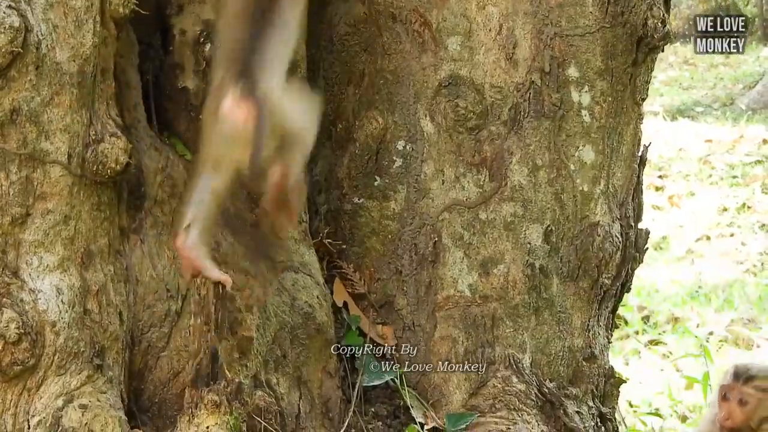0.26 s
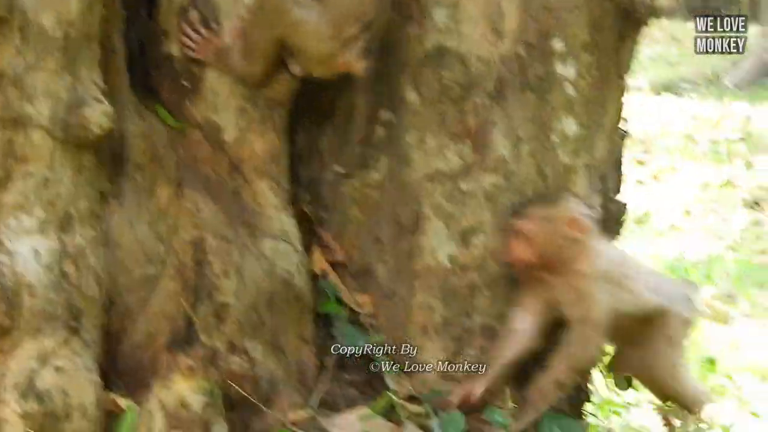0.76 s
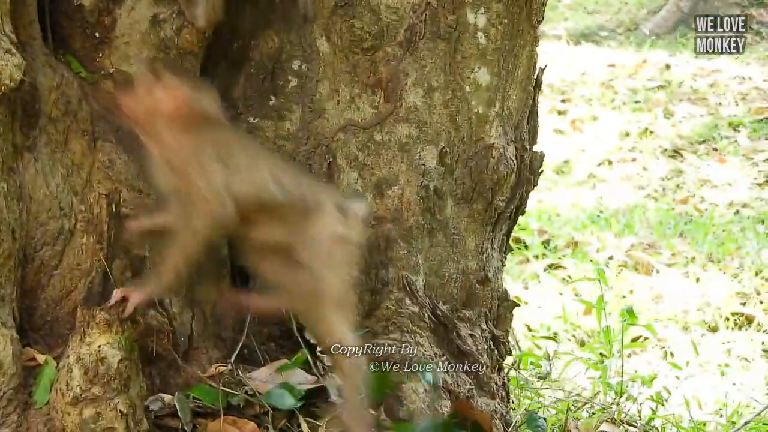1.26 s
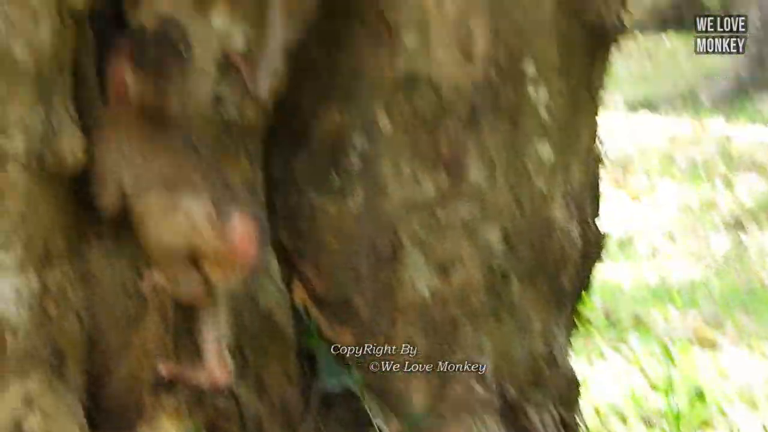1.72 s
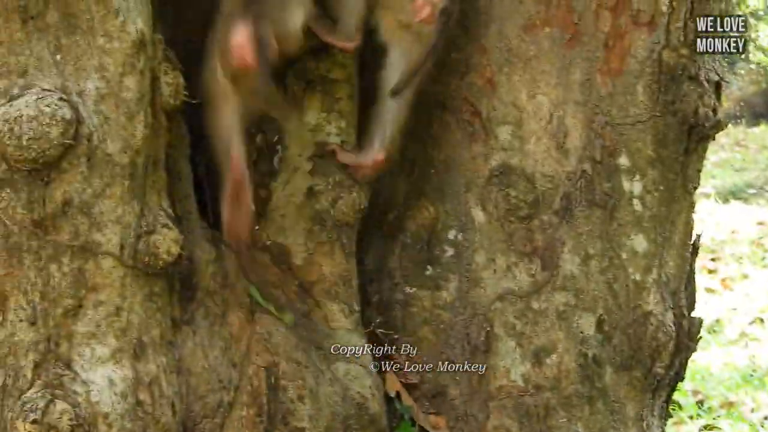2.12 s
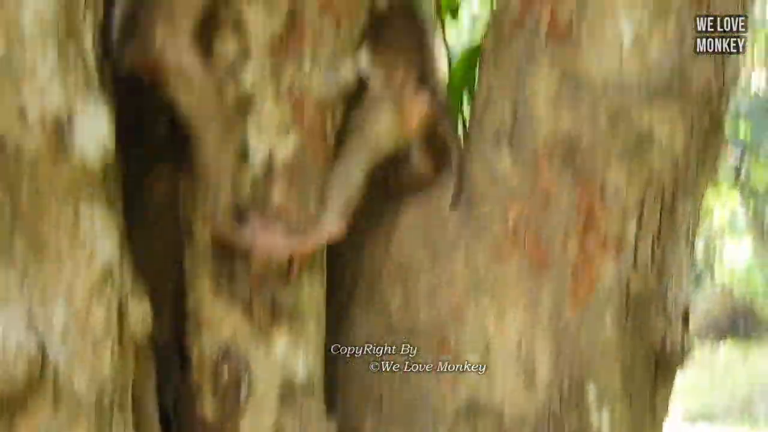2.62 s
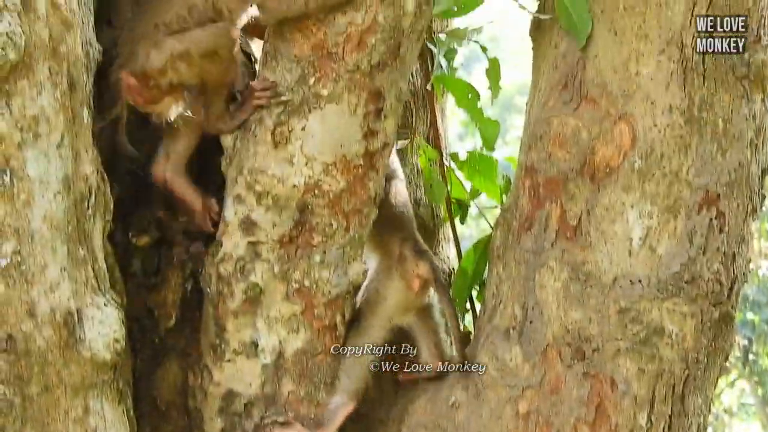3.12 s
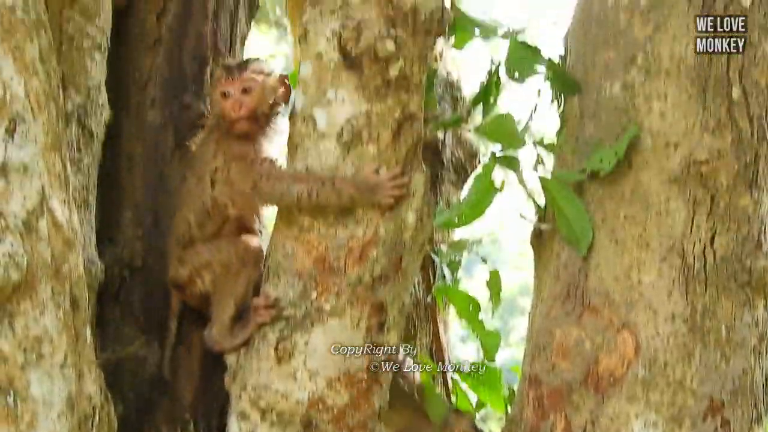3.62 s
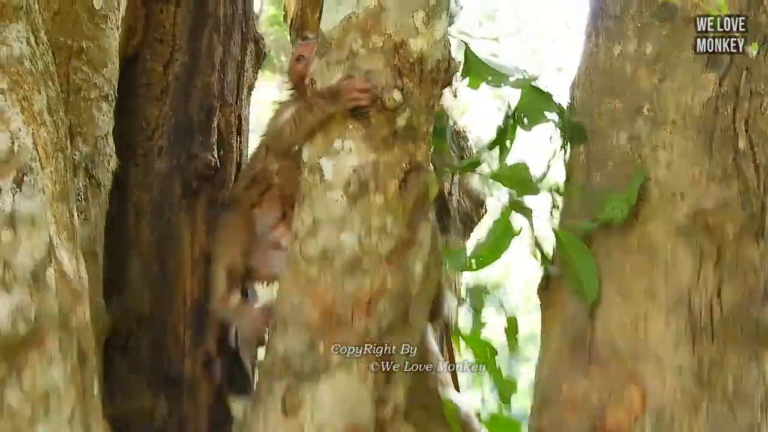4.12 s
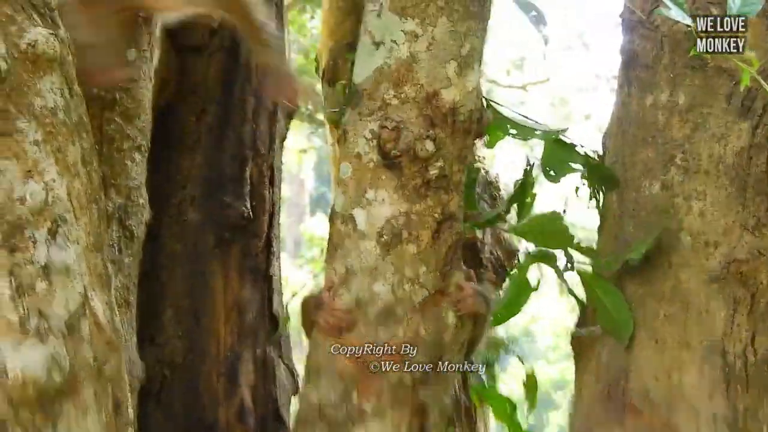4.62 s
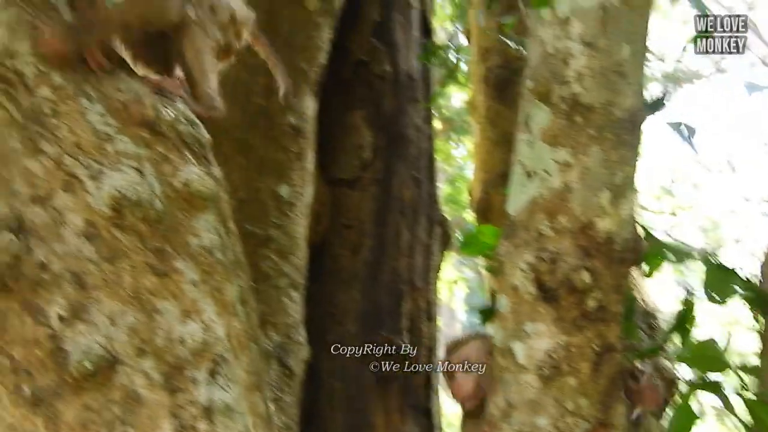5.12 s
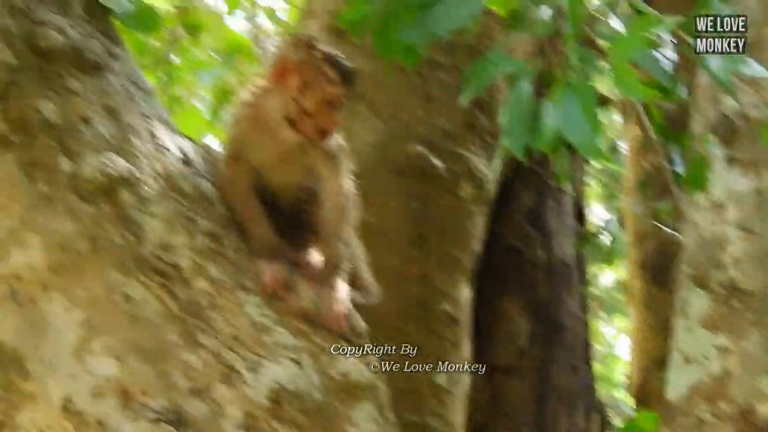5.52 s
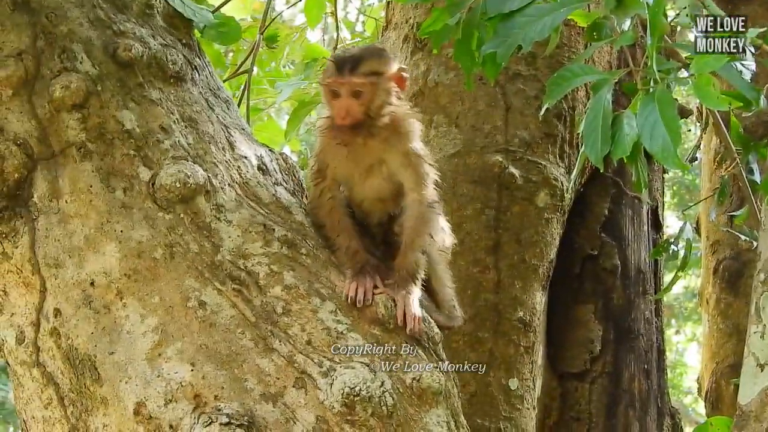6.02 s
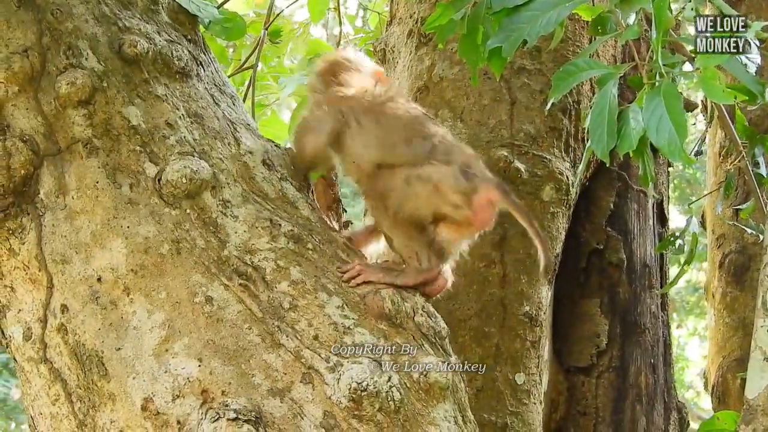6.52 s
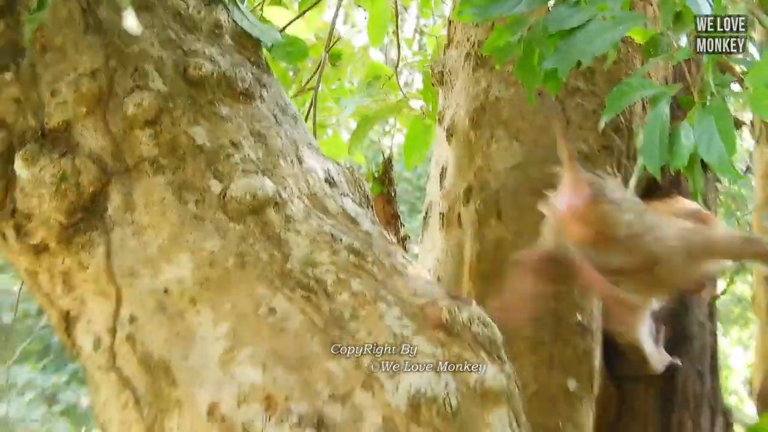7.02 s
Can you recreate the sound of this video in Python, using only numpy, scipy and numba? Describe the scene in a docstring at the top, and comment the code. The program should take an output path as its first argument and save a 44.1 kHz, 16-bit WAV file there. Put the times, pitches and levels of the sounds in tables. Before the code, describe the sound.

Cicadas ring in a steady, shimmering high drone over faint low traffic rumble, with small bird chips, distant soft hoots and late twig ticks.

```python
"""A park: cicadas drone in its trees, each buckling its ribs some 270 times a second and ringing near 2.7, 5.5, 8.2 kHz.
Near singers are stacks of multiples of that rate; the crowd behind them is coloured noise, as are the distant traffic
and a fading whirr. A small bird chips in falling sine sweeps and far hoots sound as sines with an octave.
Twigs tick and bark scrapes in short bursts of noise. All is heard on a close microphone pair, left and right."""
import sys
import numpy as np
from numba import njit
from scipy import signal
from scipy.fft import rfft, irfft, next_fast_len
from scipy.io import wavfile
from scipy.ndimage import uniform_filter1d

SR = 44100
rng = np.random.default_rng(int(sys.argv[2]) if len(sys.argv) > 2 else 0)


def generate_wav(sig):
    """Save sig (samples, or channels by samples) to the path in sys.argv[1] as 16-bit PCM at SR."""
    pcm = np.round(np.clip(np.atleast_2d(sig).T, -1, 1) * 32767).astype(np.int16)
    wavfile.write(sys.argv[1], SR, pcm)


N = 320077
T = np.arange(N) / SR  # s


def undb(db):
    """Decibels to an amplitude factor."""
    return np.exp(np.asarray(db) * np.log(10) / 20)


def walk(rate, size=8):
    """Random levels held 1 / rate s and slewed twice, in steps of a few samples; spread near 1."""
    k = int(SR / rate / size)
    held = np.repeat(rng.standard_normal(N // (k * size) + 1), k)
    slewed = uniform_filter1d(uniform_filter1d(held, k), k)
    return np.repeat(1.3 * slewed, size)[:N]


def noise(spectrum, ports):
    """Coloured noise of rms 1 at two ports that share part of it, the right one late."""
    size = next_fast_len(N)
    hz = np.arange(1, size // 2 + 2) * SR / size
    log_hz = np.log(hz)
    point_hz, db = np.transpose(spectrum)
    colour = undb(np.interp(log_hz, np.log(point_hz), db, left=-120, right=-120))
    point_hz, *columns = np.transpose(ports)
    alike, lag_us, pan_db = (np.interp(log_hz, np.log(point_hz), c) for c in columns)
    alike = np.clip(alike, 0, 1)
    left, other = rfft(rng.standard_normal((2, size)))
    late = left * np.exp(-2j * np.pi * hz * lag_us / 1e6)
    right = alike * late + np.sqrt(1 - alike ** 2) * other
    tilt = undb(pan_db / 2)
    pair = irfft(np.array([left * tilt, right / tilt]) * colour, size)[:, :N]
    return pair / pair.std()


@njit(fastmath=True)
def partials(turn, gains, swell, band):
    """Multiples of one turning phase, each with its own size and phase at the two ports."""
    out = np.zeros((2, len(turn)))
    for start in range(0, len(turn), 256):
        step = turn[start:start + 256]
        z = np.ones(len(step), np.complex128)
        for k in range(gains.shape[1]):
            z *= step
            if band[k] >= 0:  # -1 marks a silent multiple
                for i in range(len(z)):
                    level = swell[band[k], start + i]
                    out[0, start + i] += (gains[0, k] * z[i]).imag * level
                    out[1, start + i] += (gains[1, k] * z[i]).imag * level
    return out


# Colour of the far traffic. Each row: frequency in Hz, relative level in dB per Hz.
TRAFFIC_COLOUR = [(15, -19), (25, -30), (48, -4.5), (72, -3.5), (88, -9.5), (101, 2.5), (113, -4.5),
                  (127, 3), (138, -1.5), (149, 3.5), (163, 0.5), (170, -5), (179, 0.5), (192, -10),
                  (205, -9.5), (250, -15), (330, -48)]


def traffic(level_db=-50.5):
    """Distant traffic blurs into a low rumble of coloured noise, nearly alike at both ports."""
    ports = [(30, 0.96, 0, -1.2), (156, 1.0, 74, -1.06)]  # columns as in WHIRR_PORTS
    return noise(TRAFFIC_COLOUR, ports) * undb(level_db + .5 * walk(3.94))


# Colour of the whirr. Each row: frequency in Hz, relative level in dB per Hz.
WHIRR_COLOUR = [(150, -32), (200, 3), (250, 0.5), (350, -6.5), (366, -4), (380, -8), (450, -12),
                (680, -12.5), (760, -10.5), (800, -7.5), (860, -12), (1400, -11), (2000, -16),
                (3500, -17.5), (4200, -17), (6000, -24.5)]
# How the whirr reaches the two ports. Each row: frequency in Hz, share alike from 0 to 1,
# lag of the right port in microseconds, left minus right in dB.
WHIRR_PORTS = [(260, 0.88, 64, 3.8), (420, 0.52, 110, 0.92), (1500, 0.76, 35, 2.6), (3800, 0.3, 28, 2)]


def whirr(near_db=-54, far_db=-64.5, fade_s=5.34, treble_db=-3, treble_db_per_s=0.57):
    """Coloured noise from the left recedes; what lies above 600 Hz fades more slowly."""
    level_db = far_db + (near_db - far_db) * np.exp(-T / fade_s)
    sound = noise(WHIRR_COLOUR, WHIRR_PORTS)
    treble = signal.sosfilt(signal.butter(2, 600, "high", fs=SR, output="sos"), sound)
    sound = sound + (undb(treble_db + treble_db_per_s * T) - 1) * treble
    return sound * undb(level_db + .6 * walk(5))


# Far hoots. Each row: start in seconds, length in seconds, middle pitch in Hz before the waver,
# level in dB before the fading, octave above in dB relative to the note.
HOOTS = [(.95, .5, 800, -75, -20), (1.83, .9, 800, -72, -20), (2.96, .18, 790, -73, -20),
         (3.45, .17, 890, -83, 10), (5.335, .13, 828, -78, 11), (6.7, .09, 810, -69.5, -14),
         (6.73, .11, 830, -75.5, 11), (6.79, .04, 870, -66, -20), (6.85, .07, 800, -70, -8),
         (6.93, .06, 1010, -67, -20), (6.975, .065, 810, -68.5, -1), (7.035, .075, 805, -69, -20),
         (7.22, .04, 700, -68, -20)]


def hoots(rise=.025):
    """Soft, slightly wavering notes with an octave, from the left; they climb as they sound."""
    out, waver, fade = 0, walk(14), undb(3.5 * walk(25))
    for start, length, hz, db, octave_db in HOOTS:
        shape = np.clip(np.minimum(2 * (T - start), start + length - T) / .02, 0, 1)
        # a short note climbs by the full share of its pitch; one over .15 s holds steadier
        climb = rise * min(.15 / length, 1) * np.clip((T - start) / length - .5, -1, 1)
        phase = 2 * np.pi * hz * np.cumsum(1 + .011 * waver + climb) / SR
        out = out + undb(db) * shape * (np.sin(phase) + undb(octave_db) * np.sin(2 * phase))
    return out * fade * undb([[2], [-2]])


# Twig ticks. Each row: start in seconds, starting level of the noise in dB.
TICKS = [(6.860, -43), (6.864, -55), (6.9, -57), (6.946, -52), (6.963, -56), (6.981, -56), (7.047, -40),
         (7.051, -51), (7.058, -57), (7.21, -56)]


def twigs(decay_s=.0015):
    """Twigs tick as a small monkey pushes off: bright noise starts at once and dies in milliseconds."""
    colour = [(2500, -20), (4000, -11), (5500, -9), (6400, 0), (9500, -2), (10300, -18)]
    ticks = sum(undb(db) * (T >= s) * np.exp(-np.abs(T - s) / decay_s) for s, db in TICKS)
    return noise(colour, [(6000, .8, 0, 0)]) * ticks


# Bark under a foot. Each row: middle in seconds, length in seconds, level in dB before the roughness.
SCRAPES = [(6.851, .008, -61), (6.862, .03, -67), (6.97, .6, -70), (6.972, .03, -65), (7.03, .04, -60.5),
           (7.05, .012, -70), (7.078, .02, -69)]


def bark():
    """Bark scrapes under the monkey's foot: rough noise with two resonant peaks swells and falls."""
    colour = [(400, -5), (500, -5), (700, -9), (1000, -4), (1450, -12), (1590, 5), (1720, -11),
              (1980, -10), (2110, 4), (2250, -10), (4500, -10), (5200, -20)]
    scrapes = sum(undb(db) * np.exp(-(2 * (T - s) / length) ** 2) for s, length, db in SCRAPES)
    return noise(colour, [(1500, .7, 0, 3)]) * scrapes * undb(3 * walk(250))


# Bird chips. Each row: start in seconds, level in dB before the huskiness and echo.
CHIPS = [(1.4785, -60), (1.9096, -61), (2.0994, -63), (2.341, -62), (2.4184, -63), (2.596, -59),
         (2.7985, -60), (3.21, -63), (3.273, -60), (3.52, -61), (3.6471, -58), (3.793, -62), (3.8921, -62),
         (4.214, -58), (4.3894, -59), (4.577, -57), (4.7596, -56), (4.909, -58), (5.0679, -56),
         (5.2475, -56), (6.331, -57), (6.5345, -58), (6.7087, -57), (6.8683, -59), (7.1038, -58)]


def bird(high_hz=6750, low_hz=3900, length_s=0.022, echo_db=1.5):
    """Each chip is a quick, husky falling whistle, smeared by the trees."""
    out = np.zeros(N)
    u = np.arange(int(length_s * SR)) / (length_s * SR)
    for start, db in CHIPS:
        bend = 1 + 0.031 * rng.standard_normal()
        hz = (high_hz + (low_hz - high_hz) * u) * bend
        shape = undb(db - 9 * (u - .3)) * np.sin(np.pi * u) ** .25
        out[int(start * SR):][:len(u)] += shape * np.sin(2 * np.pi * np.cumsum(hz) / SR)
    out = out * undb(2 * walk(400))  # husky
    t = T[:SR // 10]
    tails = rng.standard_normal((2, len(t))) * np.exp(-t / .015)
    tails = tails / np.sqrt(np.sum(tails[0] ** 2))
    return out + undb(echo_db) * signal.fftconvolve(out[None], tails, axes=1)[:, :N]


def shrill_insect(hz=12090, width_hz=45, level_db=-78):
    """Another, smaller insect: a narrow, fluttering band of noise at the top."""
    colour = [(hz - 4 * width_hz, -24), (hz, 0), (hz + 2 * width_hz, -28)]
    return noise(colour, [(hz, .7, 50, -.7)]) * undb(level_db + 4.9 * walk(11))


# Colour of the crowd further off, blurred and a little flat. Each row: frequency in Hz, relative level in dB per Hz.
CROWD_COLOUR = [(2000, -28), (2380, -18), (2460, -14), (2680, 0), (2750, -8), (2790, -11.5), (3100, -21),
                (3400, -27), (3950, -33), (4200, -27), (4290, -21), (4400, -24.5), (4800, -18), (5000, -12),
                (5090, -7), (5160, 0), (5330, 0), (5420, 3), (5530, -5), (5850, -14), (6300, -15.5),
                (6900, -19.5), (7500, -15.5), (7620, -10), (7900, -2.5), (8020, -3.5), (8120, 0),
                (8250, -5.5), (8550, -11), (8900, -15), (9500, -19), (10800, -21), (11000, -27),
                (11300, -37), (11700, -43), (12300, -48)]
# How the crowd reaches the two ports. Each row: frequency in Hz, share alike from 0 to 1,
# lag of the right port in microseconds, left minus right in dB.
CROWD_PORTS = [(2700, .45, 35, 2), (3900, .1, 20, .5), (5150, .45, 29, 0), (5500, .35, 29, 0),
               (6300, .12, 20, 0), (7000, .1, 30, 0), (7800, .55, 49, -.3), (8300, .55, 48, -.3),
               (10000, .3, 50, .4)]


def cicada_crowd(level_db=-48.5, group_hz=650, patchy_db=1.87):
    """Many far singers blur into noise; groups at different pitches each swell and fade alone."""
    spectrum = rfft(noise(CROWD_COLOUR, CROWD_PORTS))
    hz = np.arange(N // 2 + 1) * SR / N
    crowd = 0
    for centre in np.arange(2, 21) * group_hz:
        window = np.clip(1 - np.abs(hz - centre) / group_hz, 0, 1)  # overlaps its neighbours
        crowd = crowd + irfft(spectrum * window, N) * undb(patchy_db * walk(8))
    return crowd * undb(level_db + .8 * walk(9))


# Near singers. Each row: buckling rate in Hz, its quick wander in %, level in dB relative to the song,
# treble loss in dB per kHz, lag of the right port in microseconds before the band's share.
CICADAS = [(274.6, .2, 1, 2.2, 5), (273.8, .07, 1, .75, 55), (273.1, .05, -1, 0, 45),
           (272.8, .06, -3.5, 0, 38), (272.1, .07, 2.5, .7, 42), (271.3, .05, -4.5, 0, 36),
           (270.7, .14, 3.5, 1.5, 45), (270.0, .18, 3, 1.8, 35), (269.0, .22, 3, 2.3, 15),
           (268.0, .28, 0, 2.3, 20)]
# Their song. Each row: multiple of the buckling rate, level in dB before the singer's own level and loss.
SONG = [(8, -99), (9, -89.5), (10, -62), (11, -85.5), (12, -82.5), (18, -75.5), (20, -53), (21, -76),
        (22, -70), (24, -74.5), (26, -97), (28, -70.5), (30, -51), (32, -67.5), (34, -72), (38, -100),
        (40, -70)]
# The one swell of the near singers. Each row: time in seconds, level in dB before the band's share.
SWELL = [(0, -2.5), (3, -2.5), (4.9, 0.5), (6.2, -1), (7.26, -1.5)]
# How far each band follows the swell. Entries for the low, middle and high band: share from 0 to 1.
SWELL_SHARE = np.array([.8, .9, .1])
# The recorder's body shades the right port in the low band. Entries low, middle, high: left minus right in dB.
BAND_PAN_DB = np.array([6.5, -.2, -.8])
# The middle band bends round that body and lags less. Entries low, middle, high: share of the lag.
BAND_LAG_SHARE = np.array([1, .72, 1])


def near_cicadas(flutter_db=3.5, effort_db=2.6, drift_percent=.09):
    """Neighbours a fraction of a percent apart beat; leaves make every band of a singer flutter alone."""
    swell_db = np.outer(SWELL_SHARE, np.interp(T, *np.transpose(SWELL)))
    k, song_db = np.transpose(SONG)
    k = np.round(k)
    place = k.astype(int) - 1
    band_of = np.clip(np.round(k / 10) - 1, 0, 2).astype(int)
    band = np.full(place.max() + 1, -1)
    band[place] = band_of
    tilt = undb(BAND_PAN_DB[band_of] / 2)
    out = 0
    for hz, wander, db, loss_db, lag_us in CICADAS:
        # the rate also roams over a third of a second, the effort over a fifth
        roam_percent = wander * walk(20) + drift_percent * walk(3)
        turn = np.exp(2j * np.pi * np.cumsum(hz * (1 + roam_percent / 100)) / SR)
        start_phase = np.exp(2j * np.pi * rng.random(len(k)))
        size = undb(db + song_db - loss_db * k * hz / 1000) * start_phase
        lag = 2 * np.pi * k * hz * lag_us * BAND_LAG_SHARE[band_of] / 1e6
        lag = lag + .65 * rng.standard_normal(len(k))  # echoes off the trunks scatter the phase
        gains = np.zeros((2, len(band)), complex)
        gains[:, place] = size * tilt, size / tilt * np.exp(-1j * lag)
        effort = effort_db * walk(4.965)
        flutter = flutter_db * np.array([walk(40) for _ in swell_db])
        out = out + partials(turn, gains, undb(swell_db + effort + flutter), band)
    return out


def scene():
    """All the sources of the park together."""
    insects = near_cicadas() + cicada_crowd() + shrill_insect()
    distance = traffic() + whirr()
    return insects + distance + bird() + hoots() + twigs() + bark()


def record(dry):
    """The recorder cuts the top, steeply above 12.25 kHz."""
    return signal.sosfilt(signal.ellip(8, .2, 70, 12250, fs=SR, output="sos"), dry)


dry = scene()
out = record(dry)
generate_wav(out)
```